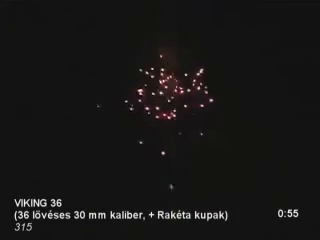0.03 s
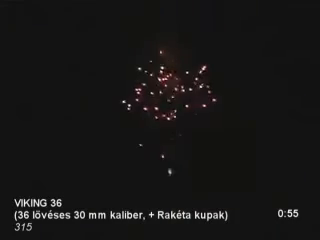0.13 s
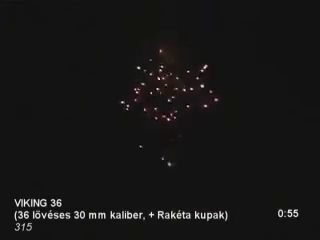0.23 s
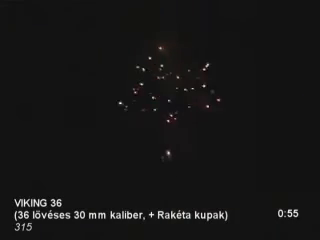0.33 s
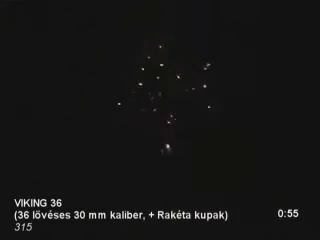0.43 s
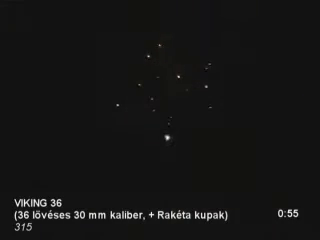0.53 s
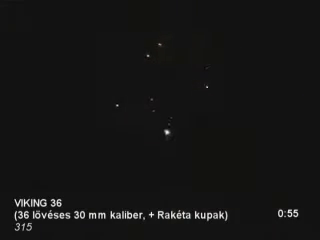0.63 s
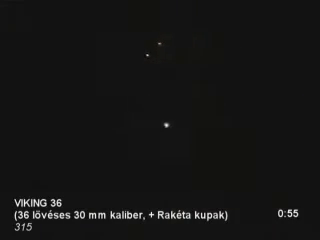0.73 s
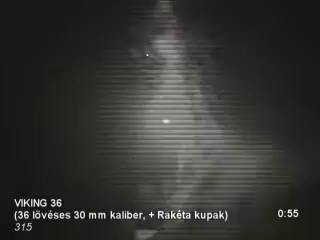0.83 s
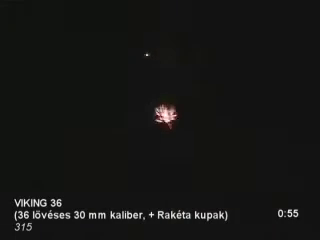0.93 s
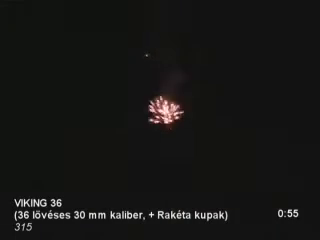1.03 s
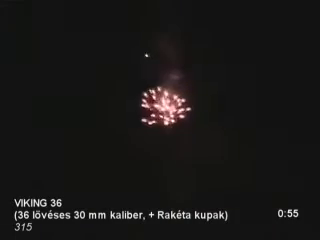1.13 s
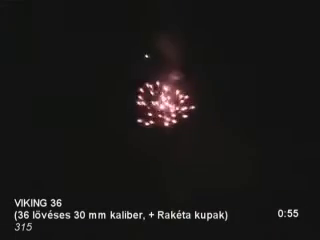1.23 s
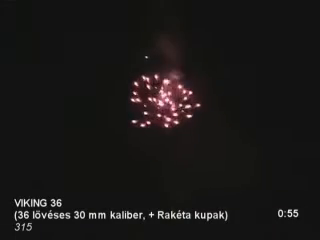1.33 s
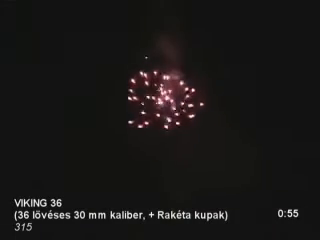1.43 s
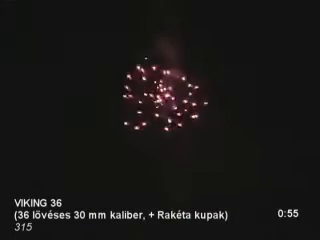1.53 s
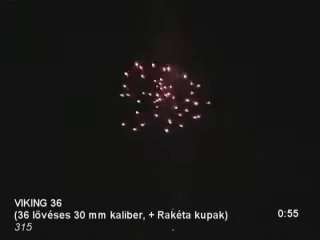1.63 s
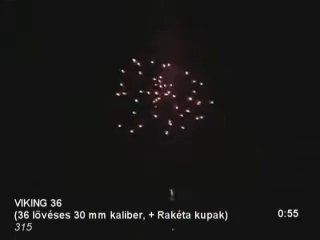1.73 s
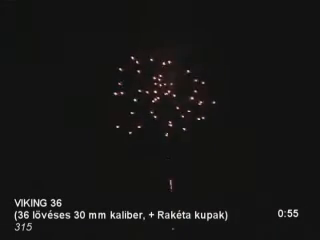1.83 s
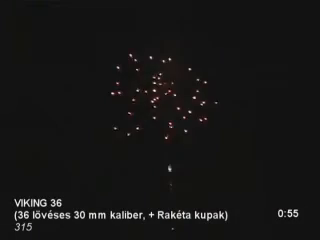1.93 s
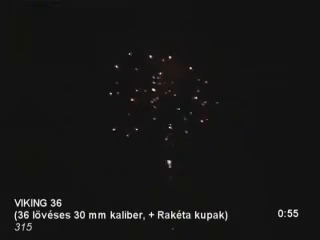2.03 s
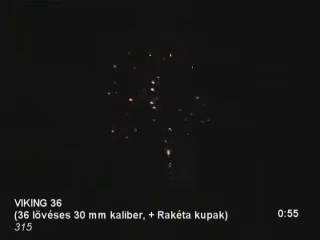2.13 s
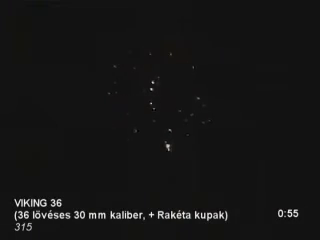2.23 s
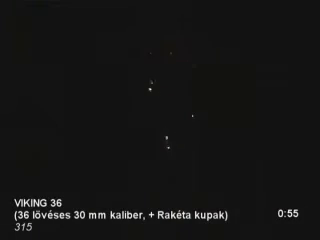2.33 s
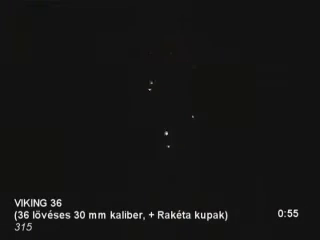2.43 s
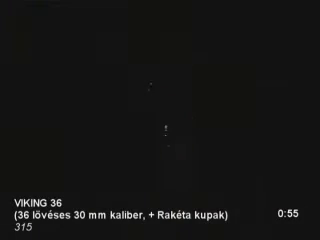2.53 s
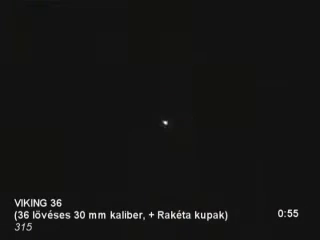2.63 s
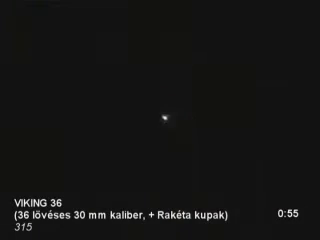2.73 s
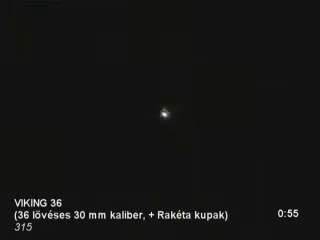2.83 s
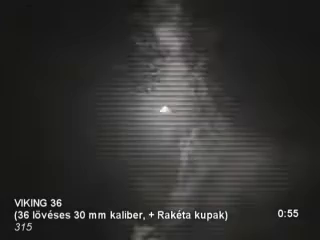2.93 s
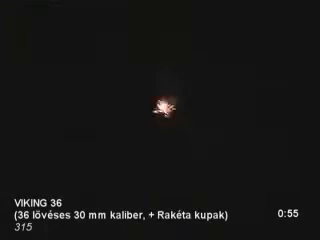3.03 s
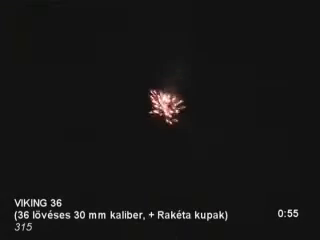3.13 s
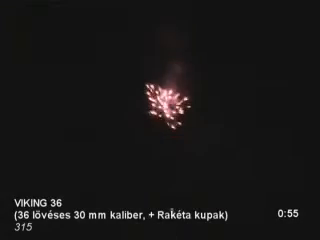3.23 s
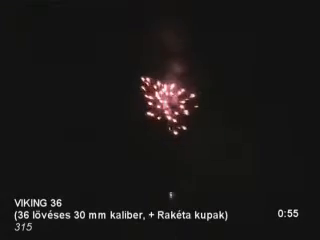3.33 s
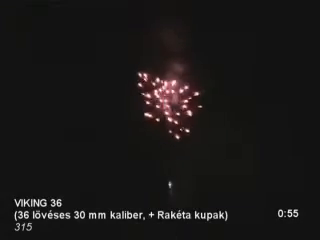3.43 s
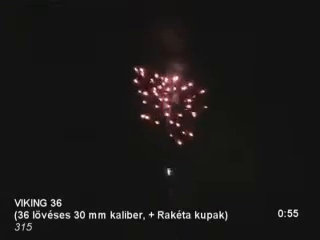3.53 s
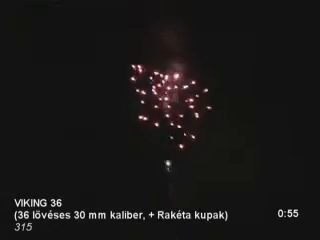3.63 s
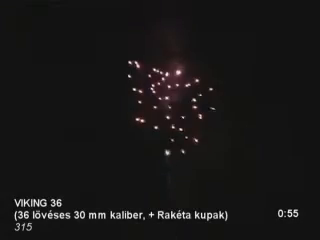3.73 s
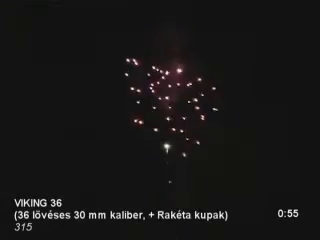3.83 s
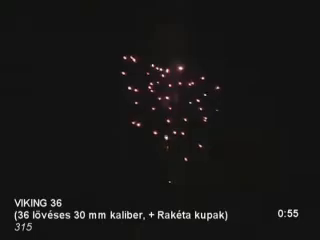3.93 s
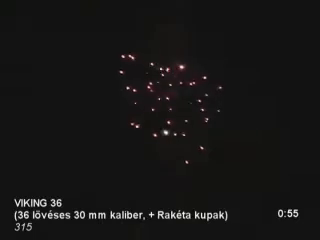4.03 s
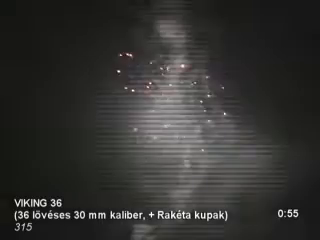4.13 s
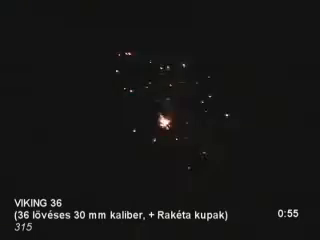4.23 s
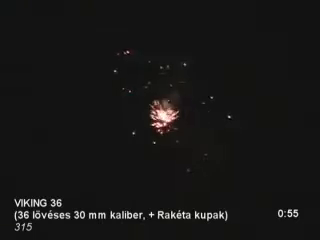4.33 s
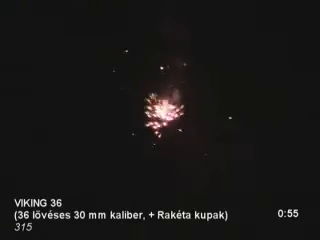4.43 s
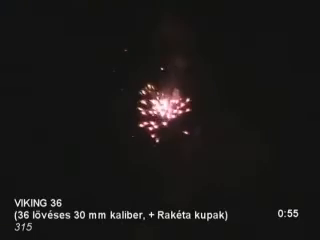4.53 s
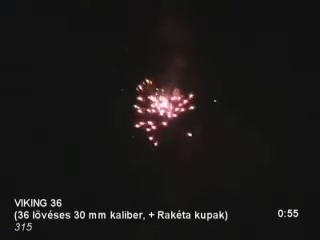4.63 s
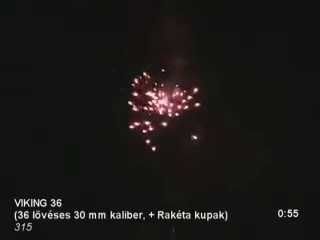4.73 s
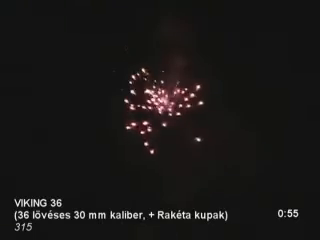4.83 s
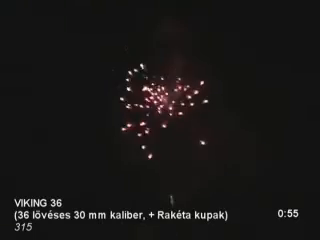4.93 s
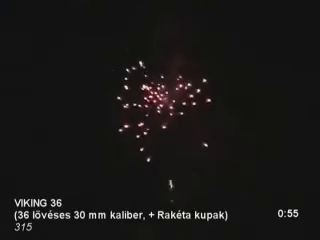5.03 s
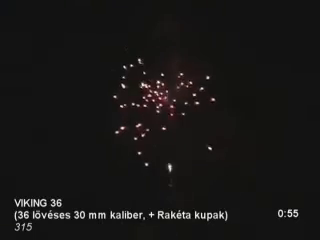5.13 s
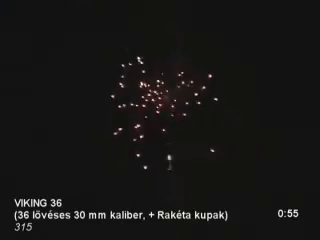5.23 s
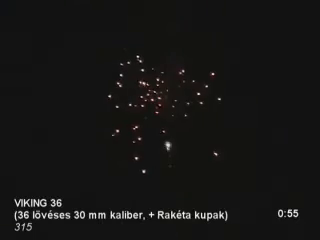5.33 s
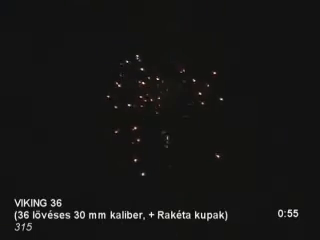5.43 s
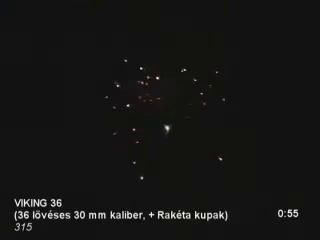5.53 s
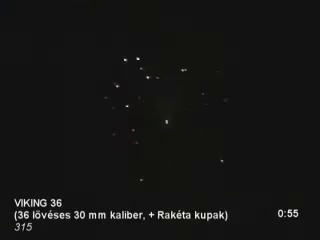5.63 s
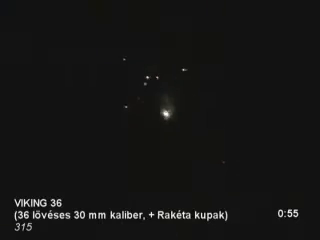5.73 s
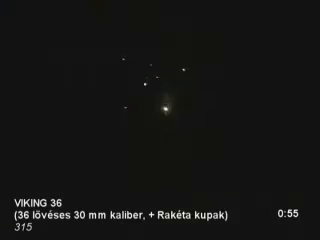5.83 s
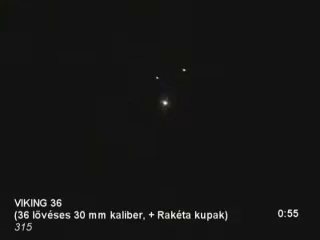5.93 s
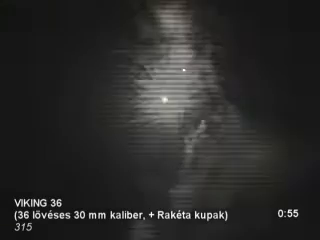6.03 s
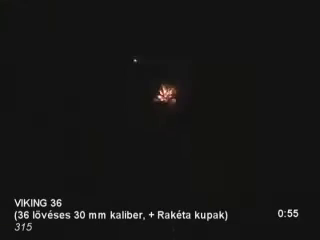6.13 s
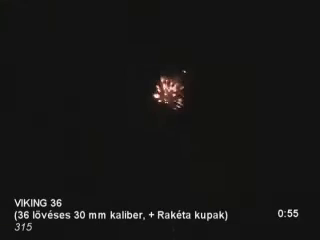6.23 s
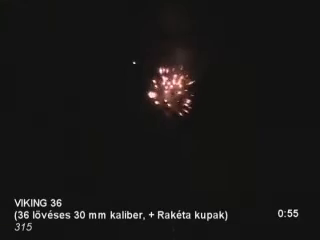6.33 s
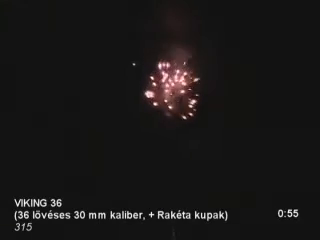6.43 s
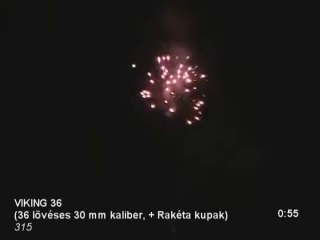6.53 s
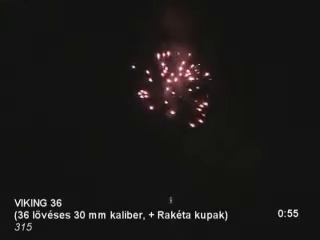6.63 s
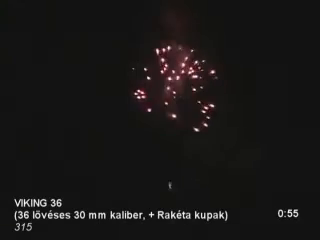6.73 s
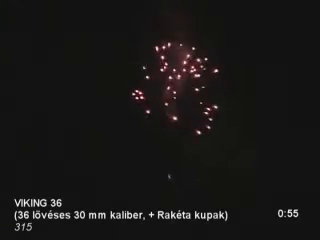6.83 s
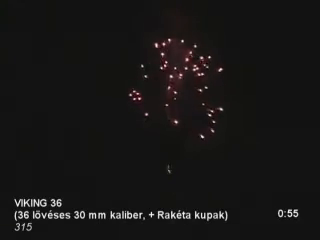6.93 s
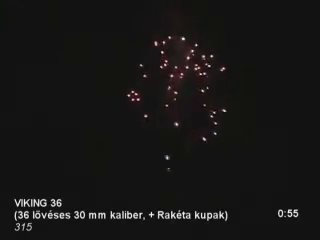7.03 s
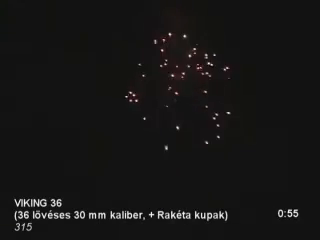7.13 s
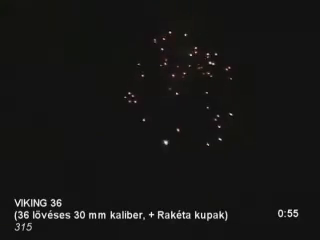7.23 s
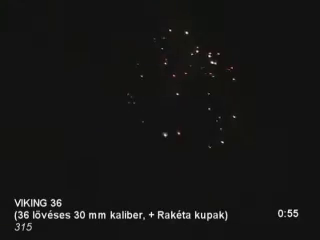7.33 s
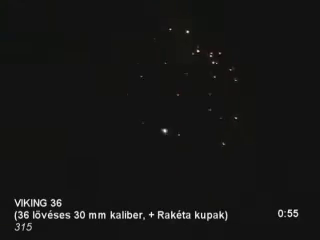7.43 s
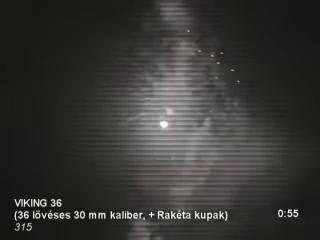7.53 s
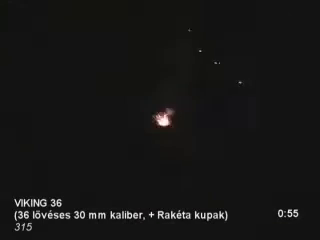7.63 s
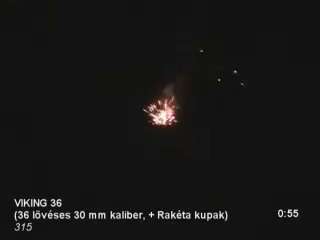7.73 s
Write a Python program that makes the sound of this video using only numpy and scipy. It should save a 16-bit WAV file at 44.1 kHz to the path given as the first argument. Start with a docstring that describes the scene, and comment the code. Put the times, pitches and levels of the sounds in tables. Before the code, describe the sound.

A firework cake fires in sequence on open ground at night, about a hundred metres away. The fading echo of an earlier shot is heard first. Then four shells burst overhead, one to two seconds apart, each a sharp bang that briefly overloads the microphone. A lighter launch crack with a small thump falls close to each one. Every bang scatters back from the trees as a rush that swells, darkens and fades over faint hiss.

```python
"""Open ground at night: a firework cake fires about a hundred metres away.
Each lift charge cracks and thumps in its tube; each shell bursts overhead with a blast wave that
overloads the microphone. The bangs scatter back from field, bushes, tree line and woods as a rush
that swells, darkens and fades over still air and faint hiss."""
import sys
import numpy as np
from scipy import signal
from scipy.io import wavfile

SR = 44100
rng = np.random.default_rng(int(sys.argv[2]) if len(sys.argv) > 2 else 0)


def wav_out(sig):
    """Save sig, one row per channel (or a flat mono array), as 16-bit PCM at SR to the path in sys.argv[1]."""
    wavfile.write(sys.argv[1], SR, np.round(np.clip(np.atleast_2d(sig).T, -1, 1) * 32767).astype(np.int16))


N = 343085
TIME_S = np.arange(N) / SR
BANDS_HZ = 32 * 2 ** (np.arange(27) / 3)
STEP_SAMPLES = 100   # power curve spacing

# Shots before 0 s sound only through their rush.
# shell bursts (time [s], level [dB], push length [ms], ground reflection lag [ms])
BURSTS = [(-.42, 12, 1.26, 5), (1.2834, 13, 1.446, 4.42), (3.3787, 12.5, 1.2, 4.7),
          (4.6056, 13.5, 1.33, 4.33), (6.5018, 13, 1.23, 5.06)]
# lift charges (time [s], crack level [dB], charge size [dB])
LIFTS = [(-.08, 5, -1.5), (1.6874, 7, -3.5), (3.3197, 4, 1.5), (5.0009, 6.5, 0.3), (6.6569, 2.5, 0)]
# single echo of a lift (delay [s], level [dB], low-pass [Hz])
LIFT_ECHOES = [(0.0368, -20, 9880)]
# nearest trunks and walls, echoing each burst (delay [s], level [dB])
REFLECTORS = [(.0243, -39), (.045, -38), (.108, -36), (.192, -33.5), (.226, -40)]
# scattering zones: ground, field, bushes, tree line, woods, far woods
# (first return [s], swell [s], level [dB], fade [dB/s])
ZONES = [(.004, 0.0029, -46, 299), (.01, 0.0033, -49.5, 2), (0.087, 0.027, -45, 19.5),
         (.222, 0.049, -35.5, 7.5), (.45, 0.33, -41, 12.5), (1.049, 0.48, -56, 17)]
# spectra of the scattered sound (frequency [Hz], density [dB])
FIELD_SPECTRUM = [(60, -17.5), (140, -4.5), (230, -1), (380, -0.5), (560, -11.5), (850, -16.5),
                  (1400, -6.5), (2500, -12), (4000, -15.5), (6200, -16.5), (9500, -26), (12000, -57)]
BUSH_SPECTRUM = [(60, -28), (140, -2.5), (230, -4), (380, -13), (560, -8), (850, -6.5), (1250, -7.5),
                 (2500, -14.5), (4000, -20), (9000, -46)]
TREE_SPECTRUM = [(60, -39), (170, -22), (260, -20.5), (360, -1.5), (540, 2), (800, -7), (1150, -4),
                 (1500, -9), (2300, -10), (4000, -18.5), (6000, -22.5), (8000, -42.5), (10000, -63),
                 (13000, -95.5)]
WOODS_SPECTRUM = [(60, -30.5), (160, -13), (240, -12), (320, 1), (480, 4.5), (650, -3), (1050, -6.5),
                  (1400, -13), (2100, -18), (2800, -31), (6500, -46), (10000, -80.5)]
# air absorption (frequency [Hz], loss [dB/s])
AIR_LOSS = [(60, 17), (250, 2), (500, 3), (1000, 3.5), (2000, 12), (4000, 27), (7000, 42), (12000, 83.5)]
# colour of a lift's rush against a burst's (frequency [Hz], gain [dB])
LIFT_COLOUR = [(100, -10.5), (450, -15.5), (1200, -6.5), (3000, 3), (8000, -7)]
# still air and microphone hiss (frequency [Hz], density [dB])
NIGHT_SPECTRUM = [(30, 7), (100, -0.5), (450, 5), (1000, -5.5), (2000, -10.5), (3500, -17.5), (7000, -21),
                  (9000, -36), (12000, -50), (16000, -53)]
# input recovery after overload (gain [dB], time constant [s])
RECOVERY = [(-49, 0.005), (-59, 0.065)]


def from_db(db):
    """Decibels to gain."""
    return 10 ** (np.asarray(db) / 20)


def unit_rms(x):
    """Scale to rms 1."""
    return x / np.sqrt(np.mean(x ** 2) + 1e-20)


def per_band(table):
    """A frequency table at the third-octave centres, as a column."""
    hz, value = np.transpose(table)
    return np.interp(np.log(BANDS_HZ), np.log(hz), value)[:, None]


def band_shares(spectrum):
    """Share of the power in each third octave."""
    power = from_db(per_band(spectrum)) ** 2 * BANDS_HZ[:, None]
    return power / power.sum()


def cut(x, hz, kind, order=2):
    """Butterworth filter."""
    return signal.sosfilt(signal.butter(order, hz, kind, fs=SR, output="sos"), x + 1e-18)


def resonant_high_pass(x, hz, q):
    """Second-order high-pass, ringing slightly at its corner."""
    w = 2 * np.pi * hz / SR
    return signal.lfilter(*signal.bilinear([1, 0, 0], [1, w / q, w * w]), x + 1e-18)


def add(out, start_s, sound):
    """Mix in a sound if it starts inside the scene."""
    at = round(start_s * SR)
    if 0 <= at < N:
        out[at:at + len(sound)] += sound[:N - at]


def puff(age_s, peak_s):
    """Envelope: rises to 1 at peak_s, then decays."""
    return age_s / peak_s * np.exp(1 - age_s / peak_s)


def banded_noise(power, flicker_db=1.0, flicker_hz=25, swell_db=1.2, swell_hz=5):
    """Third-octave noises following power (bands x steps), with quick flicker and slow swells."""
    out, white = np.zeros(N), rng.standard_normal((3, N))
    steps_s = np.linspace(0, TIME_S[-1], power.shape[1])
    for k, centre_hz in enumerate(BANDS_HZ):
        flicker, swell = (unit_rms(cut(rng.standard_normal(len(steps_s)), hz * STEP_SAMPLES, "low"))
                          for hz in (flicker_hz, swell_hz))
        gain = np.sqrt(power[k]) * from_db(flicker_db * flicker + swell_db * swell)
        band = cut(white[k % 3], centre_hz * 2 ** (np.array([-1, 1]) / 6), "band", order=3)
        out += np.interp(TIME_S, steps_s, gain) * unit_rms(band)
    return out


def night_power(level_db=-62):
    """Band power of still air and microphone hiss."""
    return from_db(level_db) ** 2 * band_shares(NIGHT_SPECTRUM)


def scattered_power(delay_s):
    """Band power returning after a bang: each zone swells and fades; long paths lose treble."""
    spectra = [FIELD_SPECTRUM, FIELD_SPECTRUM, BUSH_SPECTRUM, TREE_SPECTRUM] + [WOODS_SPECTRUM] * 2
    power, air_db_per_s = 0, per_band(AIR_LOSS)
    for (first_s, swell_s, db, fade_db_per_s), spectrum in zip(ZONES, spectra):
        swept_share = np.clip((delay_s - first_s) / swell_s, 0, 1) ** (2 / 3)
        loss_db = (fade_db_per_s + air_db_per_s) * np.maximum(delay_s - first_s - swell_s, 0)
        power += band_shares(spectrum) * swept_share * from_db(db - loss_db) ** 2
    return power


def rush(burst_db=-.5, db_per_doubling=4.5, lift_db=-10):
    """Countless small echoes merge into noise over the night air; a longer push returns more."""
    steps_s = np.linspace(0, TIME_S[-1], N // STEP_SAMPLES)
    shots = [(s, burst_db + db_per_doubling * np.log2(push_ms)) for s, _, push_ms, _ in BURSTS]
    shots += [(s, lift_db + charge_db + per_band(LIFT_COLOUR)) for s, _, charge_db in LIFTS]
    returns = sum(from_db(db) ** 2 * scattered_power(steps_s - s) for s, db in shots)
    return cut(banded_noise(night_power() + returns), 9900, "low", order=12)


def echoes(x, table):
    """Delayed, dulled copies off single trunks and walls; bass passes round them."""
    out, thin = np.zeros(N), cut(x, 550, "high")
    for delay_s, db, dull_hz in table:
        add(out, delay_s, from_db(db) * cut(thin, dull_hz, "low"))
    return out


def burst_echoes(x, trunks=9, near_s=.27, far_s=.58, trunk_db=-31, dull_hz_at_100_ms=2100):
    """Echoes off the near reflectors and tree-line trunks; the farther, the duller."""
    depth = (np.arange(trunks) + rng.uniform(0, 1, trunks)) / trunks
    paths = list(REFLECTORS) + [(s, trunk_db) for s in near_s + (far_s - near_s) * depth]
    return echoes(x, [(s, db, dull_hz_at_100_ms / (s / .1) ** .18) for s, db in paths])


def blast(push_ms):
    """Shock front, short push, longer suction; inverted by the microphone."""
    age = TIME_S[:SR // 20] * 1000 / push_ms
    return -(1 - age) * np.exp(-age)


def lifts(gas_db=-15, gas_lead_s=.0022, thump_db=-22.5, thump_hz=158, thump_lag_s=.0003):
    """Lift charges: a thin crack inside a spit of gas, then the tube's thump."""
    crack, gas, thump = np.zeros((3, N))
    age_s = TIME_S[:SR // 20]
    tube = np.sin(2 * np.pi * thump_hz * age_s) * puff(age_s, peak_s=.0021)
    for s, crack_db, charge_db in LIFTS:
        add(crack, s, from_db(crack_db) * blast(push_ms=.22))
        hiss = unit_rms(cut(rng.standard_normal(len(age_s)), [1100, 3600], "band", order=1))
        spit = cut(hiss, 800, "high") * puff(age_s, peak_s=.002) ** 2
        add(gas, s - gas_lead_s, from_db(gas_db + charge_db) * spit)
        add(thump, s + thump_lag_s, from_db(thump_db + charge_db) * tube)
    # grazing the ground thins the low middle, between body and edge
    body = from_db(-5) * cut(crack, 400, "low")
    edge = resonant_high_pass(cut(crack, 2900, "low"), hz=1400, q=1.0)
    sharp = cut(body + edge + gas, 7600, "low", order=6)
    return sharp + cut(thump, 85, "high") + echoes(sharp, LIFT_ECHOES)


def bursts(ground_db=-10, tear_db=-23, tear_s=.003):
    """Shell bursts: a blast wave, its ground reflection and the rasp of the tearing case."""
    direct, bounce, rasp = np.zeros((3, N))
    for s, db, push_ms, lag_ms in BURSTS:
        wave = from_db(db) * blast(push_ms)
        add(direct, s, wave)
        add(bounce, s + lag_ms / 1000, wave)
        tear = rng.standard_normal(len(wave)) * np.exp(-TIME_S[:len(wave)] / tear_s)
        add(rasp, s, from_db(db) * tear)
    waves = cut(direct, 6000, "low") + from_db(ground_db) * cut(bounce, 700, "low")
    swings = resonant_high_pass(waves, hz=348, q=.95)   # microphone bass cut
    return swings + burst_echoes(swings) + from_db(tear_db) * cut(rasp, 3200, "low", order=1)


def microphone_treble(x, dull_hz=10000, ring_hz=11350, ring_db=4):
    """Treble roll-off with one narrow capsule resonance."""
    peak = signal.iirpeak(ring_hz, Q=12, fs=SR)
    ringing = signal.lfilter(*peak, signal.lfilter(*peak, x))
    return cut(x, dull_hz, "low", order=3) + from_db(ring_db) * ringing


def scene():
    """Shots and their returns, mono."""
    return (bursts() + lifts() + rush())[None]


def record(dry, clip_level=.91, overload_level=1.05, coupling_hz=.55, cutoff_hz=16100):
    """The input clips; deep overloads shift its bias, which swings slowly back; the top is cut."""
    clipped = np.clip(dry, -clip_level, clip_level)
    overload = np.tanh(4 * np.maximum(np.abs(dry) - overload_level, 0)) + 1e-18
    bias = sum(from_db(db) * signal.lfilter([1], [1, -np.exp(-1 / (tau_s * SR))], overload)
               for db, tau_s in RECOVERY)
    shifted = clipped + cut(bias, coupling_hz, "high", order=1)
    return cut(microphone_treble(shifted), cutoff_hz, "low", order=16)


dry = scene()
out = record(dry)
wav_out(out)
```